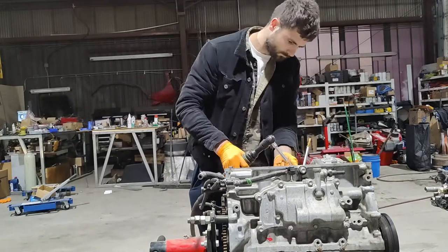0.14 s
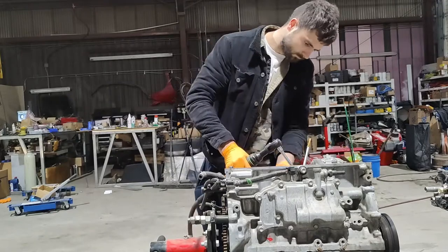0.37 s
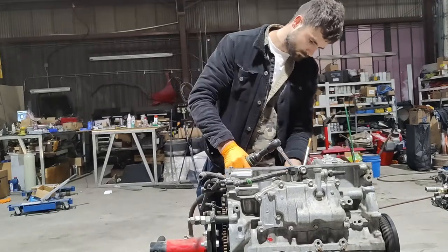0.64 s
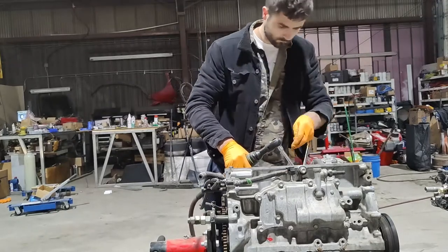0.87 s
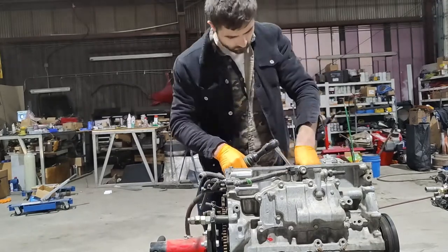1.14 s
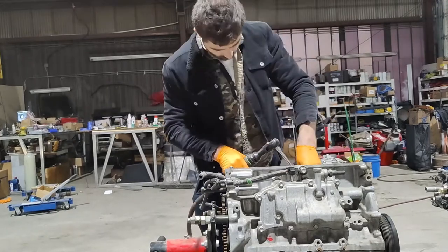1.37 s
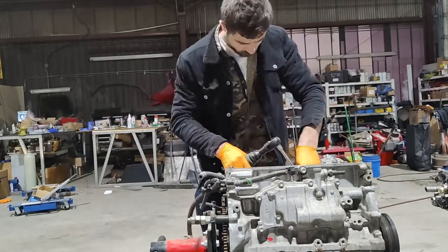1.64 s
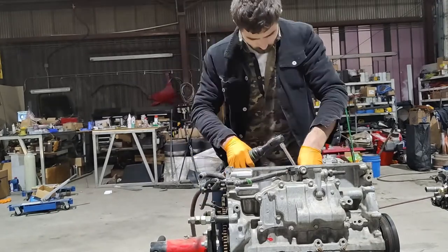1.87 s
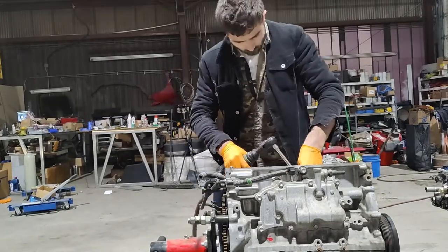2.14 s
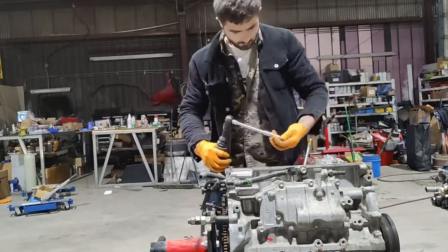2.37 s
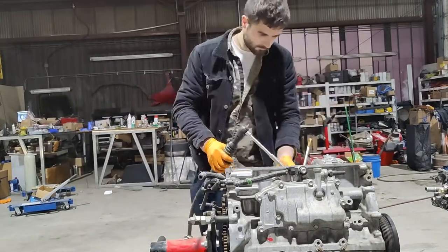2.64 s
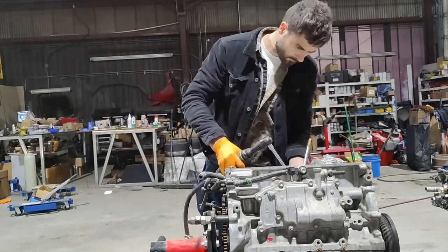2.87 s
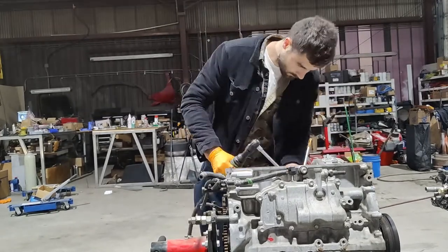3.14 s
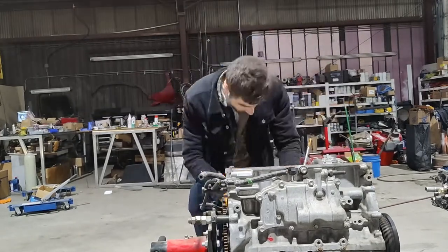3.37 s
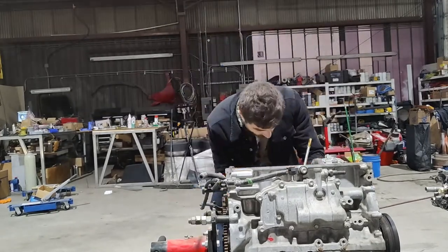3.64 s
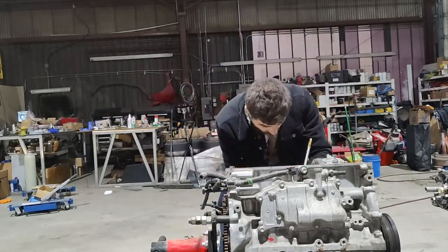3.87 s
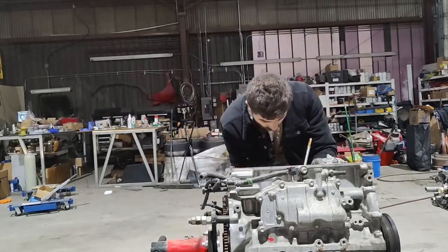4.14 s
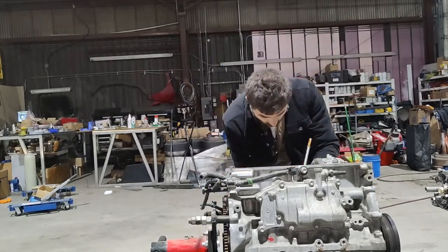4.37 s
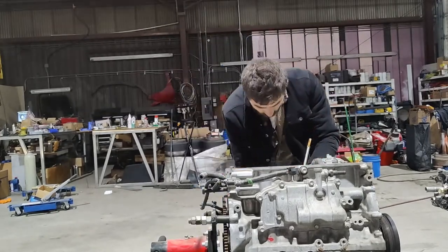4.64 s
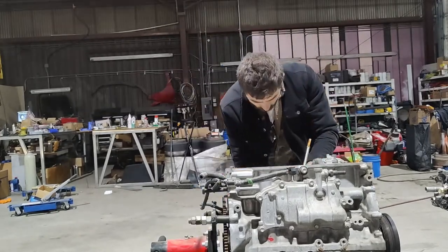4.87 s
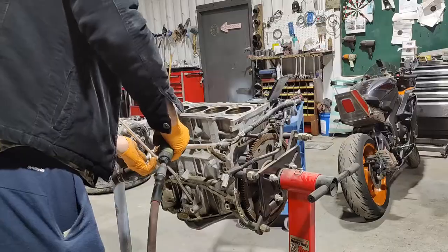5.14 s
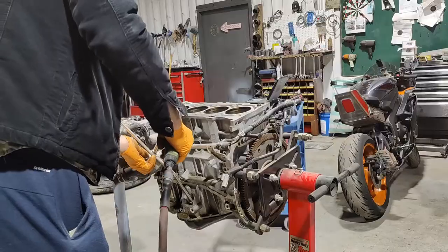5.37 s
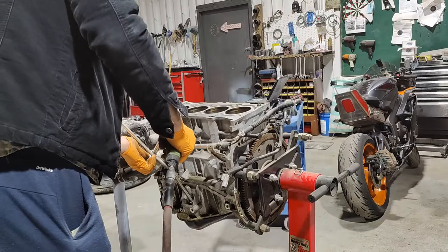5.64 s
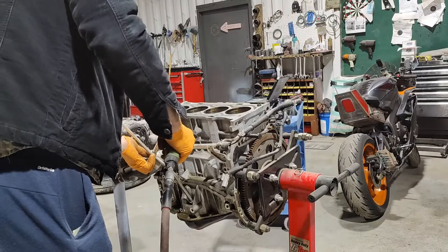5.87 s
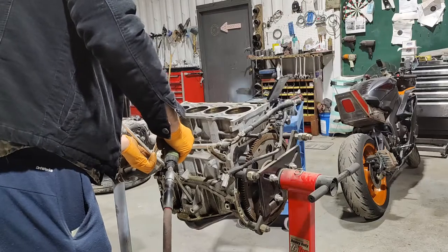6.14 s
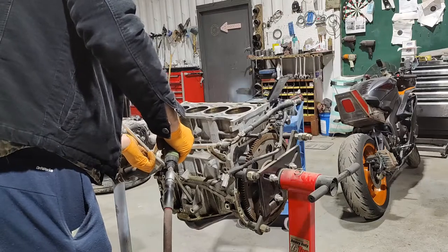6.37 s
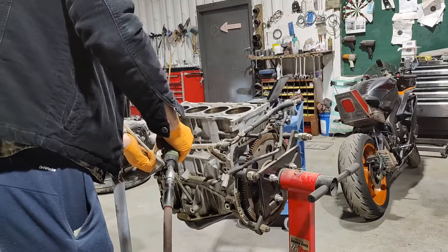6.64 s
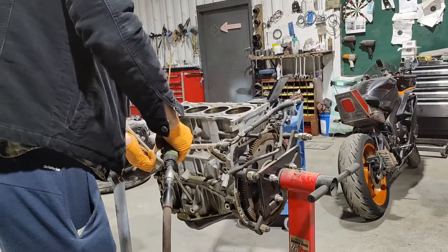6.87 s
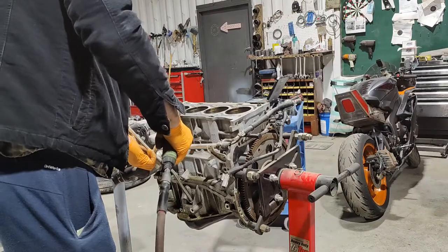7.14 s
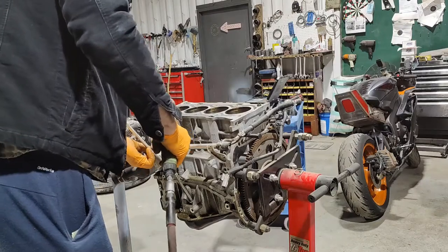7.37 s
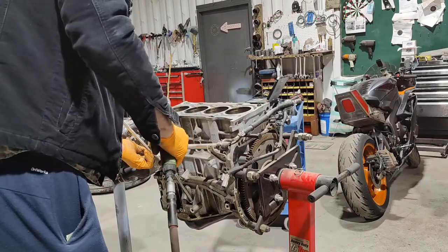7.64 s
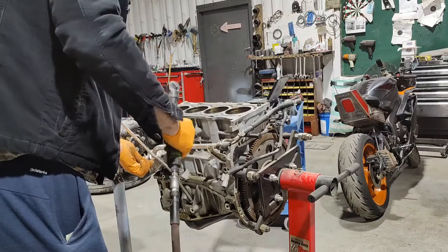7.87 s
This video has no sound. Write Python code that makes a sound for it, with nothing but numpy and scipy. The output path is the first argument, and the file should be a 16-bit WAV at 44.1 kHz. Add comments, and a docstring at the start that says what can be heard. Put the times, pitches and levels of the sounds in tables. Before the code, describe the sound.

Small clicks on cast metal, then a pneumatic wrench chirps up, whirs steadily and whoops down, twice, in an echoing garage with hissing air.

```python
"""Small knocks over a leaking air line and low rumble, then an air wrench in long bursts in a large workshop.
Three stretches, each with its own colour and levels, are cut together with a brief dip in level at each cut.
Its four-vane motor is sines locked to one rotor angle over puffing exhaust noise: the whine chirps up when
the trigger is pulled and whoops down on release. Knocks are noise ringing cast metal; leak and rumble are
coloured noise. Dull echoes and a noise-like tail make the hall."""
import sys
import numpy as np
from scipy import signal
from scipy.fft import rfft, irfft
from scipy.io import wavfile
from scipy.ndimage import uniform_filter1d

SR = 44100
rng = np.random.default_rng(int(sys.argv[2]) if len(sys.argv) > 2 else 0)


def nominal_scale(level):
    """Amplitude ratio for a level in decibels (scalar or array-like)."""
    x = np.asarray(level, float) / 20
    return 10 ** x


def materialize(psi):
    """Save the field psi as 16-bit PCM at rate SR to the path in sys.argv[1].

    A 1-D psi becomes a single channel; in a 2-D psi each row is a channel.
    """
    bounded = np.clip(np.atleast_2d(psi).T, -1, 1)
    quanta = np.round(bounded * 32767).astype(np.int16)
    wavfile.write(sys.argv[1], SR, quanta)


N = 352800

# Cuts between the three stretches. Each entry: time in seconds.
CUTS_S = [3.597, 5.018]


def evened(x):
    """Scales to rms 1."""
    return x / np.sqrt(np.mean(x ** 2) + 1e-20)


def read(points, hz):
    """Reads a spectrum on a log-frequency axis."""
    f, value = np.transpose(points)
    return np.interp(np.log(hz + 1), np.log(f + 1), value)


def pick(table, column):
    """Picks the frequency column and one value column."""
    return [(row[0], row[1 + column]) for row in table]


def drift(count, hz):
    """Slow chance up to about hz, rms 1."""
    size = int(SR / hz)
    return evened(uniform_filter1d(uniform_filter1d(rng.standard_normal(count), size), size))


def ramp(t, s, length):
    """Rises from 0 to 1 over length, starting at s."""
    return np.clip((t - s) / length, 0, 1)


def add(mix, s, sound):
    """Mixes a sound in at time s."""
    part = mix[:, round(s * SR):][:, :sound.shape[-1]]
    part += sound[..., :part.shape[1]]


# Stereo likeness of noise. Each row: frequency in Hz, left-right correlation.
LIKENESS = [(60, 0.98), (180, 0.97), (550, 0.75), (1650, 0.41), (5000, 0.44), (15000, 0.033)]
# Stereo balance of noise. Each row: frequency in Hz, left over right in dB.
BALANCE = [(60, -3), (180, 14), (550, 0), (1650, 1.5), (4970, 2.5), (15000, -3.5)]


def noise(colour, count, lead_s, patchy_db):
    """Rms-1 stereo noise shaped in short frames, with patches of more and less level in time and frequency."""
    frames, hz = count // 128 + 5, np.fft.rfftfreq(512, 1 / SR)
    a, b, c, d, patches = rng.standard_normal((frames, 257, 5)).T
    patches = uniform_filter1d(patches, size=5, axis=0)
    patches = evened(uniform_filter1d(patches, size=20, axis=1))
    same = np.clip(read(LIKENESS, hz), -1, 1)[:, None]
    left = a + 1j * b
    z = np.array([left, same * left + np.sqrt(1 - same ** 2) * (c + 1j * d)])
    balance_db = np.outer([.5, -.5], read(BALANCE, hz))[..., None]
    z *= nominal_scale(read(colour, hz)[:, None] + patchy_db * patches + balance_db)
    z[0] *= np.exp(2j * np.pi * hz * lead_s)[:, None]  # the left channel leads
    return evened(signal.istft(z, nperseg=512, noverlap=384)[1][:, :count])


# Motor at speed, one table a stretch. Each row: time in seconds, vane rate in Hz, whine in dB,
# whine left over right in dB as the tool turns.
RUNNING = [
    [(0.44, 1234, -29, 8), (0.476, 1232, -29.5, 14), (0.65, 1212, -24.5, -15), (0.838, 1218, -29.5, -1.5),
     (1.008, 1208, -29, 14), (1.054, 1213, -30.5, -31), (1.142, 1203, -25.5, 2), (1.492, 1192, -20.5, 4.5),
     (1.794, 1196, -23, 6), (2.09, 1184, -22.5, 2.5)],
    [(4.24, 1228, -35.5, 12), (4.298, 1230, -33, 2.0), (4.334, 1223, -33, 10), (4.446, 1219, -29, 12),
     (4.464, 1199, -42, 2.5), (4.484, 1215, -35, -15), (4.726, 1211, -30, -8), (4.826, 1197, -35, -24),
     (4.94, 1201, -29.5, 19), (5.0, 1193, -30.5, 4.0)],
    [(5.03, 1180, -19, -3.5), (5.2, 1172, -25.5, 8), (5.844, 1161, -28, 4.5), (6.054, 1159, -23, 8),
     (6.204, 1153, -27.5, 2), (6.37, 1159, -23.5, 7), (6.758, 1158, -24.5, 10), (6.864, 1159, -32.5, 1),
     (6.974, 1162, -25, 11), (7.02, 1167, -27.5, 11.5)],
]
# Trigger pulled. Each row: time in seconds, spin-up in s, lag of the air in s, first ripple crest after s,
# chirp level in dB before its ripple.
PULLS = [(.314, .027, .001, .021, -27), (4.082, .044, .011, .025, -23)]
# Trigger let go. Each row: time in seconds, coast-down in s, delay of the whoop in s, its length in s,
# whoop level in dB before its ripple.
RELEASES = [(2.095, .026, .011, .018, -13), (7.028, .038, .001, .057, -12.5)]
# Each entry: index of the pull and release that this stretch holds.
BURST_OF_STRETCH = (0, 1, 1)


def trigger(stretch):
    """Rotor inertia bends the vane rate up and down; gives time, rates, whine dB, air supply dB and pan dB."""
    pull, spin_s, lag_s, crest_s, chirp_db = PULLS[BURST_OF_STRETCH[stretch]]
    off, coast_s, delay_s, whoop_s, whoop_db = RELEASES[BURST_OF_STRETCH[stretch]]
    edges = [0, *CUTS_S, N / SR]
    t = np.arange(max(pull, edges[stretch]), min(off + .12, edges[stretch + 1]), 1 / SR)
    s, *columns = np.transpose(RUNNING[stretch])
    run_hz, whine_db, pan_db = (np.interp(t, s, column) for column in columns)

    since = np.maximum(t - off, 0)
    up = np.tanh(((t - pull) / spin_s) ** 1.5)
    stall_hz = 200  # the coasting rotor sinks toward this
    hz = up * (stall_hz + (run_hz - stall_hz) * np.exp(-since / coast_s))

    valve_s, bleed_db_per_s = .011, 600
    opening_db = 20 * np.log10(ramp(t, pull + lag_s, valve_s) ** 2 + 0.0011)
    supply_db = opening_db - bleed_db_per_s * since

    # ripple: the level rises and dips every 21 ms as echoes interfere
    ripple_s, ripple_db = .021, 3.5
    chirp_db = chirp_db + 1.3 * ripple_db * np.cos(2 * np.pi * (t - pull - crest_s) / ripple_s)
    whine_db = chirp_db + (whine_db - chirp_db) * up ** 6 + opening_db
    whine_db += -14 * ramp(t, off, 0.012)  # gap before the whoop

    body_hz, body_width_hz = 850, 550  # the body lifts the whoop as it passes
    body_db = -10 * np.log10(1 + (2 * (hz - body_hz) / body_width_hz) ** 2)
    whoop = whoop_db + body_db + ripple_db * np.cos(2 * np.pi * (since - delay_s - .004) / ripple_s)
    remnant_db, drop_s, fade_db_per_s = -14, .006, 250
    whoop += remnant_db * ramp(t, off + delay_s + whoop_s, drop_s)
    whoop -= fade_db_per_s * np.maximum(since - delay_s - whoop_s, 0)

    begun = ramp(t, off + delay_s, 0.0043)
    whine_db = whine_db + (whoop - whine_db) * begun
    pan_db = pan_db * up ** 6 * (1 - begun) + 3 * begun  # the whoop leans left
    return t, hz, run_hz, whine_db, supply_db, pan_db


def vane_whine(vane, level_db, pan_db):
    """Sine at the vane rate, wavering in level and panned as the tool turns."""
    sides = nominal_scale(np.outer([.5, -.5], pan_db))
    level = np.sqrt(2) * nominal_scale(level_db + 1.05 * drift(len(vane), 18))
    return level * np.sin(vane) * sides / sides.mean(0)


# Exhaust port resonances. Each row: centre in Hz, width in Hz, peak gain in dB.
PORT = [(724, 1100, 14), (1400, 340, -9), (2260, 160, 6), (2770, 100, 4.5), (3320, 280, 4)]


def port_tone(vane, hz, multiple, level_db, slack):
    """Sine at a multiple of the vane rate; while gliding it flares up on the port resonances."""
    count = len(vane)
    apart = np.outer([1, -1], .5 + 0.081 * drift(count, 8))  # left and right channels get it out of step
    port = sum(nominal_scale(db) / (1 + (2 * (multiple * hz - f) / width) ** 2) for f, width, db in PORT)
    level_db = level_db + slack * (20 * np.log10(port) + 3 * drift(count, 270))
    level = np.sqrt(2) * nominal_scale(level_db + 0.28 * drift(count, 48))
    return level * np.sin(multiple * vane + apart + 2 * np.pi * rng.random())


# Exhaust colour. Each row: frequency in Hz, relative dB per Hz in each stretch.
EXHAUST = [(100, -32, -15, -26), (342, -15.5, -7, -18), (600, -12, -8, -12.5), (970, -11.5, -7, -10),
           (1500, -10, -5.5, -6), (2120, -5.5, -3, 0), (2800, -5.5, -1.5, -4.5), (4050, -2.5, 3.5, 1),
           (4630, -3.5, -0.5, -1), (5250, -2, 1, -0.5), (6550, -2, 7, 0.5), (7160, -4.5, 0.5, -2.5),
           (8600, -10, -8.5, -6), (12000, -14, -10, -8.5), (14600, -9.5, -5, -5.5)]
# Each entry: seconds by which the left channel leads in this stretch.
LEFT_LEAD_S = [0, -20e-6, 70e-6]


def exhaust(stretch, vane, level_db):
    """Turbulent air puffed out at each vane and, more weakly, each turn."""
    puffs = 1 + 0.13 * np.cos(vane) + 0.06 * np.cos(vane / 4)
    air = noise(pick(EXHAUST, stretch), len(vane), LEFT_LEAD_S[stretch], patchy_db=1.0) * puffs
    return nominal_scale(level_db + 0.23 * drift(len(vane), 40)) * air


# Levels at speed, one row a stretch. Each row: air base in dB (exhaust plays 5.5 dB above it),
# 2nd, 3rd and 4th multiple of the vane rate in dB, before waver and slide.
TONES = [(-27, -43, -29.5, -28.5), (-24.5, -34.5, -29.5, -36.5), (-22.5, -50, -29.5, -29.5)]
# Slide of the sagging tones along room resonances, one row a stretch.
# Each row: 2nd, 3rd and 4th multiple in dB per Hz of vane rate.
SLIDE = [(-.3, -0.029, 0.19), (0.18, -0.17, 0.39), (.01, 0.13, -0.31)]
# Multiples while the rotor spins up. Each entry: 2nd, 3rd, 4th in dB re the whine, before dulling.
CHIRP_TONES_DB = (-6, 4, -3)
# Multiples while the rotor coasts. Each entry: 2nd, 3rd, 4th in dB re the whine, before dulling.
WHOOP_TONES_DB = (-11, -11, -9)
# Shaft orders from uneven vanes. Each entry: multiple of the shaft rate.
SHAFT_ORDERS = (1, 3, 5, 6, 7, 8, 11, 13, 17, 20, 21)
# Their level, one row an order. Each row: dB re the air base in each stretch.
SHAFT_DB = [(-43.5, -66, -30), (-22, -21, -48), (-18.5, -24.5, -17.5), (-18.5, -22.5, -19),
            (-14.5, -16.5, -21.5), (-18, -25.5, -43), (-30.5, -18.5, -22), (-18, -19, -12),
            (-42, -12.5, -22), (-10.5, -37.5, -20), (-10, -20, -15.5)]


def wrench(stretch):
    """Vane and shaft tones on one wavering rotor angle, over exhaust air; gives start, tones, whine plus air."""
    t, hz, run_hz, whine_db, supply_db, pan_db = trigger(stretch)
    count, vanes = len(t), 4
    air_db, *tones_db = TONES[stretch]
    vane = 2 * np.pi * np.cumsum(hz * (1 + .001 * drift(count, 15))) / SR
    slack = np.clip(8 * (1 - hz / run_hz) - .3, 0, 1)  # 0 at speed, 1 while spinning up or down
    starting = t < t.mean()
    sag_hz = run_hz - np.median(run_hz)

    settle_s = 0.19  # the 4th multiple grows in after the pull
    tones_db[2] = tones_db[2] - 12 * (1 - ramp(t, PULLS[BURST_OF_STRETCH[stretch]][0], settle_s))
    dull_db = 15 * np.log2(hz / run_hz + .01)  # lost each time the speed halves

    levels = []
    rows = zip(tones_db, SLIDE[stretch], CHIRP_TONES_DB, WHOOP_TONES_DB)
    for multiple, (db, slide, chirp, whoop) in enumerate(rows, 2):
        steady_db = db + slide * sag_hz + 2.2 * drift(count, 7)
        gliding_db = whine_db + dull_db + np.where(starting, chirp, whoop)
        levels.append((multiple, (1 - slack) * steady_db + slack * gliding_db))
    for order, row in zip(SHAFT_ORDERS, SHAFT_DB):
        levels.append((order / vanes, air_db + supply_db + row[stretch]))
    tones = sum(port_tone(vane, hz, multiple, db, slack) for multiple, db in levels)

    lumps_db = 0.83 * slack * starting * drift(count, 130)  # the rotor starts unevenly
    whine = vane_whine(vane, whine_db + lumps_db, pan_db)
    return t[0], tones, whine + exhaust(stretch, vane, air_db + supply_db + 5.5)


def thump():
    """A short low push of air as the valve opens."""
    t = np.arange(2048) / SR
    level_db, pitch_hz, peak_s = -26.5, 233, 0.0054
    return nominal_scale(level_db) * np.sin(2 * np.pi * pitch_hz * t) * t / peak_s * np.exp(1 - t / peak_s)


# Resonances of the cast metal. Each row: centre in Hz, width in Hz, gain in dB.
CASTING = [(1000, 360, 11), (2300, 380, 3), (2700, 246, 4.5), (3600, 730, 2), (6360, 830, 1.5),
           (8500, 910, -11)]


def knock(level_db, centre_hz, spread_octaves, decay_s):
    """A decaying burst of noise rings the cast metal."""
    t = np.arange(4096) / SR
    hz = np.fft.rfftfreq(4096, 1 / SR)
    body = sum(nominal_scale(db) / (1 + 2j * (hz - f) / width) for f, width, db in CASTING) + 0.14
    blow = rng.standard_normal(4096) * np.exp(-t / decay_s) * (1 - np.exp(-3 * t / decay_s))
    band = np.exp(-.5 * (np.log2((hz + 1) / centre_hz) / spread_octaves) ** 2)
    sound = irfft(rfft(blow) * body * band)
    fades = ramp(t, 0, 20 / SR) * (1 - ramp(t, t[-1] / 2, t[-1] / 2))
    return nominal_scale(level_db) * sound / abs(sound).max() * fades


# Near surfaces that return low tones. Each row: delay in seconds, level in dB.
WALLS = [(.009, -10), (.026, -16), (.047, -26)]


def walls(x):
    """A few single echoes, low-passed and with sides swapped."""
    dull = signal.sosfilt(signal.butter(4, 850, fs=SR, output="sos"), x)
    out = np.zeros_like(x)
    for s, db in WALLS:
        add(out, s, nominal_scale(db) * dull[::-1])
    return out


# Reverberation. Each row: frequency in Hz, 60 dB decay time in seconds, level in dB.
HALL = [(150, 0.97, -5.5), (500, .42, -11.5), (803, .42, -16), (1180, .48, -20), (1750, 0.55, -1.5),
        (2300, 0.48, -0.5), (3700, 0.69, -6), (6000, 0.47, -3.5), (10300, 0.45, -7.5), (16000, 0.23, -13)]


def hall(x):
    """Sparse taps of random sign, each band dying at its own speed."""
    taps = np.zeros((2, SR))
    at = np.arange(800, SR - 20, 20) + rng.integers(0, 20, (2, (SR - 801) // 20))
    np.put_along_axis(taps, at, rng.choice([-1., 1.], at.shape), 1)
    taps[1] = 0.49 * taps[0] + 1.17 * taps[1]
    hz, t, z = signal.stft(taps, SR, nperseg=256)
    t60, db = (read(pick(HALL, column), hz)[:, None] for column in (0, 1))
    evening = np.sqrt(t60 * SR / 20 / np.log(1e6))  # long decays get no extra energy
    tail = signal.istft(z * nominal_scale(db - 60 * t / t60) / evening, SR, nperseg=256)[1]
    return signal.fftconvolve(x.mean(0)[None], tail, axes=1)[:, :N]


# Leak colour. Each row: frequency in Hz, relative dB per Hz in each stretch.
LEAK = [(500, -25.5, -25, -26), (1050, -9.5, -7, -7), (1500, -13.5, -14, -15.5), (2300, -10, -12, -4),
        (3900, -14, -13, -8), (5740, -11.5, -15.5, -6.5), (6580, -9.5, -7, 0), (8710, -23, -20, -15),
        (12000, -16.5, -17, -10), (13500, -19, -15, -8), (15200, -7, -10.5, -4.5)]
# Leak level. Each row: time in seconds, level in dB.
LEAK_DB = [(0, -48.5), (.3, -46.5), (2.4, -53.5), (3.1, -51), (4.05, -55.5), (7.3, -40), (8, -49)]


def leak():
    """Hiss of a leaking air line: patchy noise with its own colour in each stretch."""
    edges = np.round(np.array([0, *CUTS_S, N / SR]) * SR).astype(int)
    parts = [noise(pick(LEAK, stretch), count, LEFT_LEAD_S[stretch], patchy_db=-3.5)
             for stretch, count in enumerate(np.diff(edges))]
    return nominal_scale(np.interp(np.arange(N) / SR, *np.transpose(LEAK_DB))) * np.hstack(parts)


# Narrow hiss of the loosened coupling. Each row: time in seconds, centre in Hz,
# level in dB of the noise before it is shifted up and spread to the sides.
SIZZLE = [(7.252, 11800, -60), (7.421, 11750, -51), (7.6, 11800, -54), (7.779, 10160, -51.5),
          (7.9, 11150, -47), (8, 12000, -47)]


def sizzle():
    """Low-passed noise shifted up by a gliding carrier, stronger on the right."""
    t = np.arange(N) / SR
    s, centre_hz, level_db = np.transpose(SIZZLE)
    band = np.array([drift(N, 3000), drift(N, 3000)])
    band *= np.cos(2 * np.pi * np.cumsum(np.interp(t, s, centre_hz)) / SR) * nominal_scale([[-2], [2]])
    return nominal_scale(np.interp(t, s, level_db)) * band * (t > s[0])


# Rumble colour, one table before and one after the last cut.
# Each row: frequency in Hz, relative dB per Hz.
RUMBLE = [
    [(8.8, -35), (15, -6), (43, -2.5), (70, -10), (141, -14), (199, -27), (237, -20), (271, -22),
     (322, -27), (357, -28.5), (900, -46.5), (1170, -70.5), (1980, -120)],
    [(8.8, -41), (15, 0), (38, -2), (64, -2.5), (134, -7.5), (262, -22), (363, -22.5), (424, -27),
     (586, -26), (900, -54), (1170, -90), (1980, -120)],
]


def rumble():
    """Low rumble of the building: steady noise, partly alike on both sides."""
    t, hz = np.arange(N) / SR, np.fft.rfftfreq(N, 1 / SR)
    same = np.clip(read(LIKENESS, hz), -1, 1)
    a, b = rfft(rng.standard_normal((2, N)))
    both = np.array([a, same * a + np.sqrt(1 - same ** 2) * b])
    before, after = (evened(irfft(both * nominal_scale(read(colour, hz)), N)) for colour in RUMBLE)
    return nominal_scale(-39) * np.where(t < CUTS_S[-1], before, after)


# Knocks and scrapes of parts; the last row is a short 1.3 kHz blip at the cut.
# Each row: time in seconds, level in dB, centre in Hz, spread in octaves, decay in seconds.
KNOCKS = [(.006, -32, 2360, 1, 0.005), (.045, -61, 2800, .8, .015), (0.202, -37, 500, 1, .002),
          (0.213, -33.5, 1500, 1.4, 0.0026), (0.228, -45, 1500, 1.2, 0.012),
          (0.248, -44, 2500, 1.2, 0.0091), (2.568, -48, 2200, .6, 0.026), (2.597, -44, 1790, 1.2, .012),
          (2.861, -30.5, 3050, 1.15, 0.012), (3.352, -55, 2300, 0.65, 0.038),
          (3.429, -34, 3000, 0.85, 0.02), (3.447, -34.5, 2700, 0.97, 0.019),
          (5.012, -9.5, 1330, 0.24, 0.0041)]
# Overtones beam forward, so the room gets less of them. Each entry: dB in this stretch.
BEAMED_DB = (-6, -4, -1)
# Each entry: extra send to walls and hall in dB in this stretch.
WET_DB = [-3.5, 0, 1.5]


def scene():
    """Wrench and knocks in the hall over the background, with a brief dip in level at each cut."""
    near, sent = np.zeros((2, 2, N))
    for stretch in range(len(RUNNING)):
        s, tones, rest = wrench(stretch)
        add(near, s, tones + rest)
        add(sent, s, nominal_scale(BEAMED_DB[stretch]) * tones + rest)
    for s, *blow in KNOCKS:
        sound = knock(*blow)
        add(near, s, sound)
        add(sent, s, sound)
    for pull, _, lag_s, *_ in PULLS:
        add(near, pull + lag_s, thump())
    t = np.arange(N) / SR
    sent = sent * nominal_scale(np.array(WET_DB))[np.searchsorted(CUTS_S, t)]
    dips = [np.clip(abs(t - s) / .007, .08, 1) for s in CUTS_S]
    background = leak() + rumble() + sizzle()
    return (near + walls(sent) + hall(sent) + background) * np.prod(dips, 0)


def band_limit(x):
    """A steep low-pass at the top of the band."""
    return signal.sosfilt(signal.butter(12, 16860, fs=SR, output="sos"), x)


def record(dry):
    """Band-limits the mix with a steep low-pass."""
    edge_hz = 16050
    edge = signal.firwin(511, edge_hz, window=("kaiser", 9), fs=SR)
    finished = signal.oaconvolve(dry, edge[None], "same")
    return band_limit(finished)


dry = scene()
out = record(dry)
materialize(out)
```